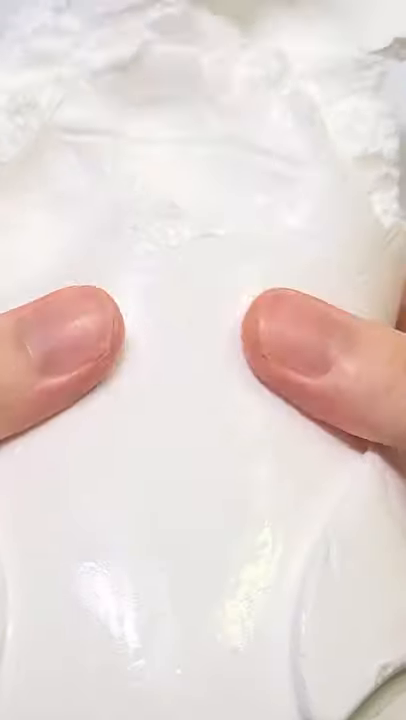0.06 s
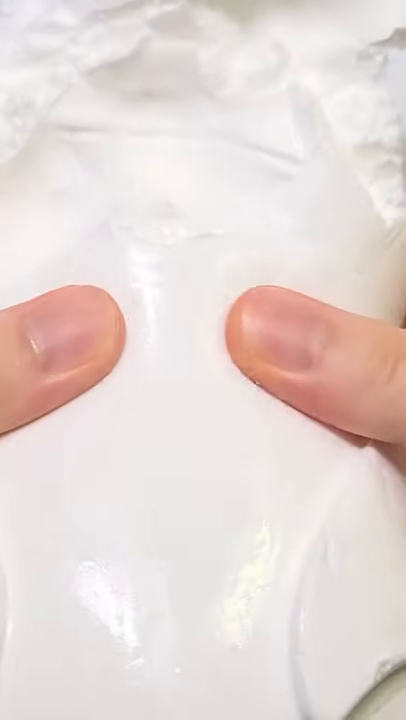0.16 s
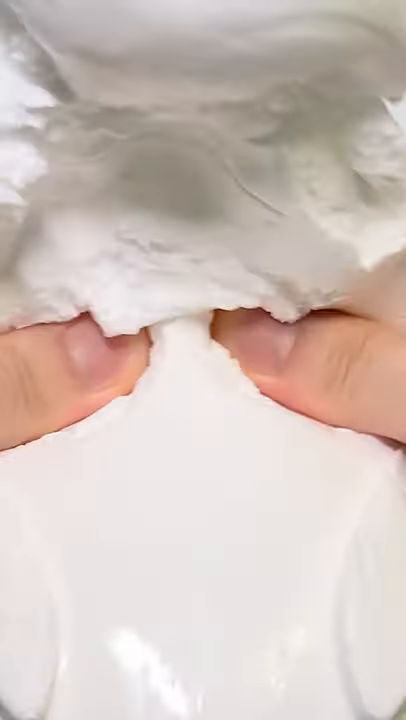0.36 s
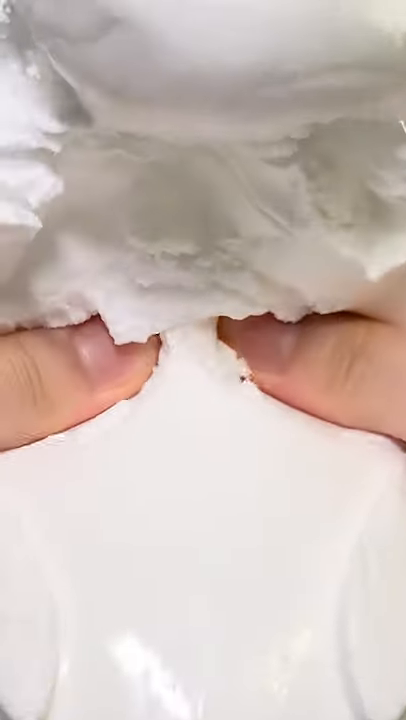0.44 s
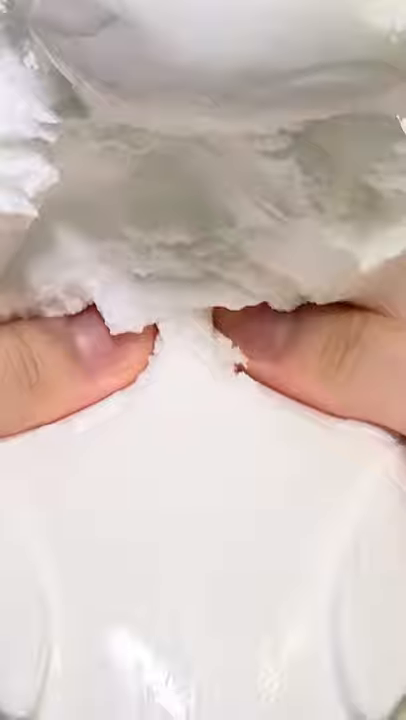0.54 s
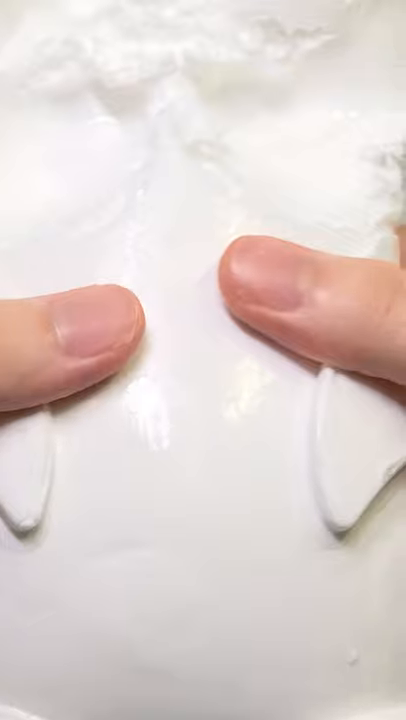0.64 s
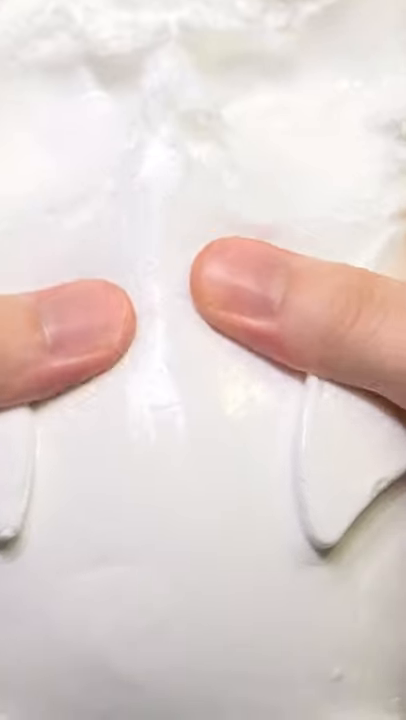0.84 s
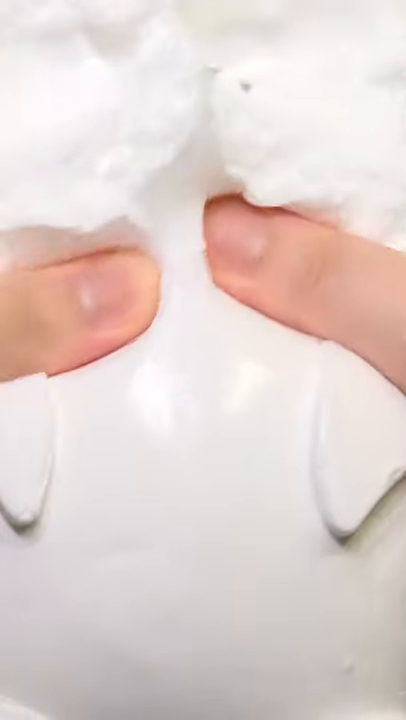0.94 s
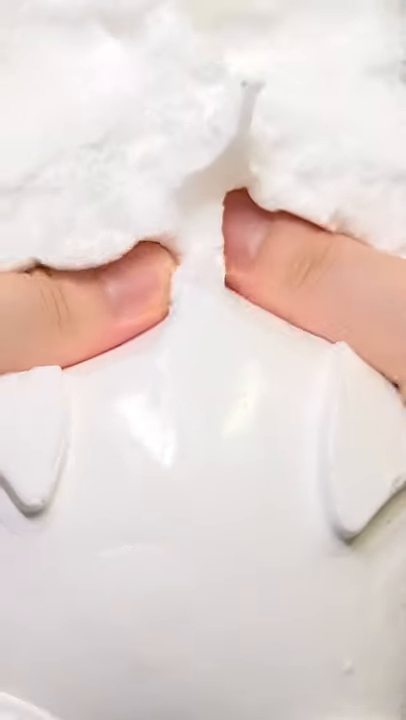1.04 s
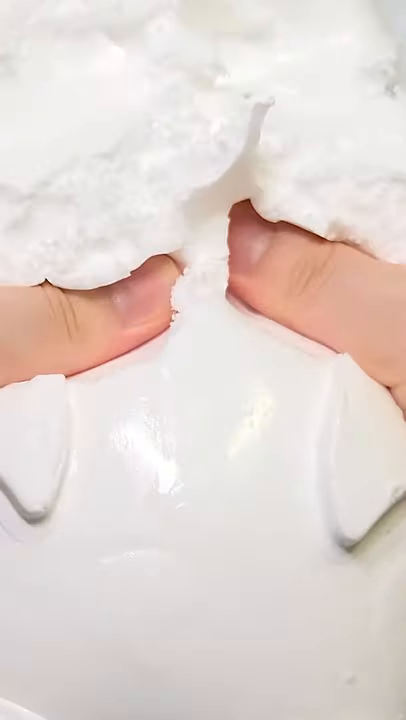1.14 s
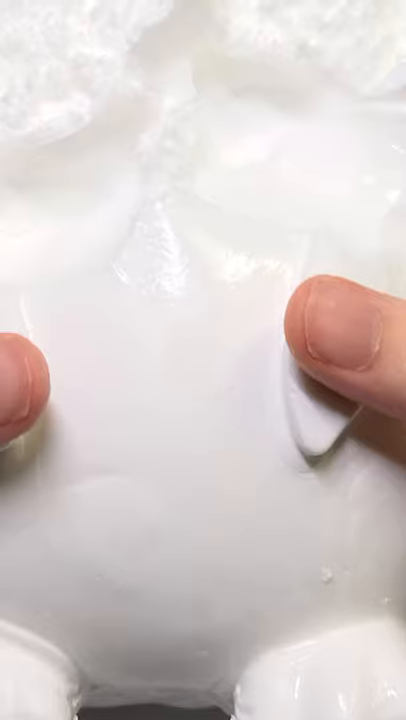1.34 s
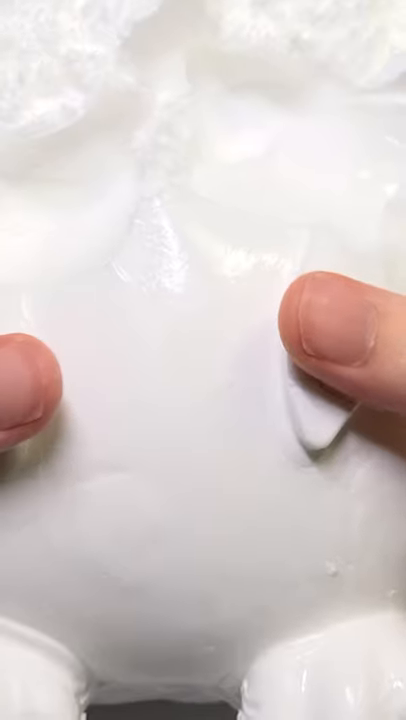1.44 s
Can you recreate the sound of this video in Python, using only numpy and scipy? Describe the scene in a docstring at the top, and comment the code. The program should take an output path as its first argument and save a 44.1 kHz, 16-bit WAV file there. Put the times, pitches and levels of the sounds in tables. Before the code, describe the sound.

A brittle crust of dry clay crunches under two thumbs, very close to the microphone in a small room. It breaks with sharp snaps and soft thuds, pauses briefly, then crunches again and ends in stray cracks.

```python
"""A brittle crust of dry clay breaks under two thumbs, pressed twice, very close to the microphone.
Each press starts with small ticks, breaks in loud snaps over a crumble of tiny fractures and ends in
stray cracks. A snap is a first break, a run of splinters and the ring of the freed flake. Skin hisses
faintly on the clay, the hollow under the crust resonates and the slab thuds as pieces give way.
A small room answers over a low rumble. The loudest snaps clip, with their peaks softly flattened."""
import sys
import numpy as np
from scipy import signal
from scipy.fft import rfft, irfft, next_fast_len
from scipy.io import wavfile

SR = 44100
rng = np.random.default_rng(int(sys.argv[2]) if len(sys.argv) > 2 else 0)


def output_pcm(signal):
    """Save a mono or channel-first signal as 16-bit PCM at the path in sys.argv[1].

    Samples are clipped to [-1, 1] before scaling.
    """
    pcm = np.clip(np.atleast_2d(signal).T, -1, 1) * 32767
    wavfile.write(sys.argv[1], SR, np.round(pcm).astype(np.int16))


N = 66150  # 1.5 s


def amp(db):
    """Decibels to gain."""
    return 10 ** (np.asarray(db) / 20)


def unit(x):
    """Scale to rms 1."""
    return x / np.sqrt(np.mean(x ** 2) + 1e-20)


def along(points, hz):
    """Read a curve of (f/Hz, value) points on a log frequency axis."""
    f, values = np.transpose(points)
    return np.interp(np.log(hz + 1), np.log(f + 1), values)


def fader(points, fade_s=0.02454):
    """Gain per sample from (t/s, level/dB) points, fading out beyond both ends."""
    times, db = np.transpose(points)
    t = np.arange(N) / SR
    outside_s = np.abs(t - np.clip(t, times[0], times[-1]))
    return amp(np.interp(t, times, db)) * np.exp(-outside_s / fade_s)


def filtered(x, response):
    """Filter x by a complex response of frequency."""
    size = next_fast_len(len(x) + SR // 4)
    return irfft(rfft(x, size) * response(np.fft.rfftfreq(size, 1 / SR)), size)[:len(x)]


def noise(response):
    """Filtered noise at rms 1."""
    return unit(filtered(rng.standard_normal(N), response))


def click(eq, size=1024):
    """A minimum-phase click of energy 1 whose spectrum in dB follows eq(Hz)."""
    cepstrum = irfft(np.log(amp(eq(np.fft.rfftfreq(size, 1 / SR)))))
    cepstrum[1:size // 2] *= 2
    cepstrum[size // 2 + 1:] = 0
    pulse = irfft(np.exp(rfft(cepstrum)))
    return pulse / np.linalg.norm(pulse)


def add(track, start_s, sound):
    """Mix a sound in at its start time."""
    i = max(0, round(start_s * SR))
    track[i:i + len(sound)] += sound[:len(track) - i]


# Crumble envelope of each press: t/s, level/dB
FIRST_EFFORT = [(0, -65.5), (.11, -67), (.17, -46), (.226, -28.5), (.238, -10), (.268, -20), (.295, -11),
                (.325, -17), (.39, -27), (.47, -49), (.56, -68.5), (.63, -63), (.68, -77.5)]
SECOND_EFFORT = [(.8, -83.5), (.862, -47), (.885, -16.5), (.9, -21.5), (.918, -12), (.955, -15.5),
                 (1.01, -27.5), (1.045, -18.5), (1.085, -31.5), (1.16, -41), (1.24, -59), (1.36, -71.5)]
# Crumble EQ of each press: f/Hz, level/dB
FIRST_CRUMBLE_EQ = [(300, -24.5), (650, -9), (900, -12), (1300, -8), (1750, -8), (2500, -14), (4500, -6),
                    (8000, -15.5), (16000, -29.5)]
SECOND_CRUMBLE_EQ = [(300, -24), (500, -6), (800, -5), (1300, -11), (2800, -5.5), (5000, -9.5), (7200, -8),
                     (11000, -18.5), (16000, -27)]
# Low end of the flexing slab: f/Hz, level/dB
FLEX_EQ = [(20, -12), (60, -8), (130, -1.5), (220, -4), (330, -14), (600, -46), (2000, -87)]


def crumble(effort, eq, grains_per_s=1400, spread_db=7, dust_db=-6, flex_db=-10.5):
    """Tiny fractures crunch over fine dust and the flexing slab; light pressure only rustles."""
    hits = rng.random(N) < grains_per_s / SR
    signs = rng.choice([-1, 1], N)
    sizes = amp(spread_db * np.minimum(rng.standard_normal(N), 2))
    grains = unit(hits * signs * sizes)
    fracture = click(lambda f: along(eq, f) - 10 * np.log10(1 + (300 / (f + 1)) ** 4))  # 300 Hz low cut
    dust = amp(dust_db) * rng.standard_normal(N)
    crunch = unit(signal.fftconvolve(grains + dust, fracture)[:N])
    hiss = signal.fftconvolve(rng.standard_normal(N), fracture)[:N]
    rustle = unit(filtered(hiss, lambda f: 1 / (1 + (f / 13000) ** 2)))
    flex = noise(lambda f: amp(along(FLEX_EQ, f)))
    force = fader(effort)
    breaking = force / (force + amp(-47))  # below -47 dB the duller rustle takes over
    return force * (np.sqrt(breaking) * crunch + np.sqrt(1 - breaking) * rustle + amp(flex_db) * flex)


# Rumble EQ: f/Hz, level/dB
RUMBLE_EQ = [(20, -6.5), (45, 2.5), (72, 3.5), (105, 2.5), (165, -3.5), (245, 3.5), (300, -25), (500, -33),
             (1500, -40.5), (5000, -40), (8000, -46), (16000, -49)]
# Rumble envelope: t/s, level/dB
RUMBLE_FADER = [(0, -51.5), (.5, -44.5), (.6, -51.5), (.75, -55), (.84, -47.5), (1.33, -51.5), (1.4, -66),
                (1.5, -71)]


def rumble():
    """A quiet bed of low room noise that swells twice and fades."""
    return fader(RUMBLE_FADER) * noise(lambda f: amp(along(RUMBLE_EQ, f)))


# Thumb slides: peak t/s, length/s, level/dB, centre f/Hz, half-width/octaves
THUMB_RUBS = [(0.0067, 0.091, -54.5, 4500, 0.76), (0.073, 0.024, -38.5, 4450, 0.49),
              (0.54, 0.014, -56, 1273, 0.15), (0.614, 0.045, -56, 4430, 0.3),
              (.618, 0.041, -54, 1249, 0.11), (0.645, 0.039, -65, 555.6, 1),
              (0.85, 0.041, -47.5, 1650, 0.047), (1.45, 0.095, -58, 3476, 0.28),
              (1.428, 0.11, -63.5, 1934, 0.59)]


def thumb_rubs():
    """Skin slides on clay in faint swells of narrow-band hiss."""
    out, t = np.zeros(N), np.arange(N) / SR
    for peak_s, length_s, db, hz, octaves in THUMB_RUBS:
        hiss = noise(lambda f: 1 / (1 + (np.log2((f + 1) / hz) / octaves) ** 2))
        swell = np.exp(-(2 * (t - peak_s) / length_s) ** 2)
        out += amp(db) * hiss * swell
    return out


# Cracks in the crust, the tick at 0.0608 s answered by its echo off the table at 0.0624 s: t/s, level/dB, flake
# f/Hz, ring level/dB, treble shelf/dB, t60/s, low-cut f/Hz
SNAP_CUES = [(.0538, -36.5, 3864, 8.5, -8.5, .012, 2400), (.0608, -25, 5260, -8.5, -15, 0.0072, 4690),
             (0.0624, -19, 3946, -1.5, -14.5, .009, 4433), (.123, -44, 4500, -4, -13, 0.024, 3900),
             (0.146, -36, 6060, -5, 0, 0.021, 1660), (0.1748, -24.5, 6060, -5, 3, .015, 1487),
             (.188, -26.5, 2794, -4, -3, .017, 1006), (0.19, -22.5, 3926, -3, -5, 0.015, 1212),
             (.206, -17.5, 2383, -11.5, -1.5, 0.022, 732), (0.2134, -15, 4855, -1, 2, 0.019, 1384),
             (0.2301, 4, 1217, -9, 0.5, 0.018, 400), (0.2336, 0, 2990, -3.5, 0, .011, 600),
             (0.243, -14, 5100, -6, 3.5, .011, 1488), (0.2465, -15.5, 4225, -3, 2.5, 0.01, 1283),
             (0.255, -13.5, 4394, -4, -2, 0.0088, 1294), (0.2664, -14.5, 3730, -6.5, -2, .011, 1110),
             (0.2759, 1.5, 1236, -2, 2, 0.0083, 444.4), (.284, 0.5, 1255, -6, 10.5, 0.024, 399.3),
             (.2865, -3, 1680, -1.5, 0, 0.014, 443), (.2975, -8, 6240, -3, 6, 0.013, 1506),
             (.307, -8.5, 1293, -5, -3.5, 0.013, 448), (.313, -13, 1736, 3.5, -8, 0.015, 550),
             (0.3186, -14, 1307, -4, 4, .011, 454), (.3325, -3, 1212, -7.5, -1.5, 0.0083, 350),
             (0.3471, -20, 4520, -5.5, 4.5, .011, 1300), (0.3636, -13.5, 1342, -7.5, 7, 0.0058, 494),
             (.375, -17.5, 1310, -7, -5, .011, 400), (.382, -15.5, 7080, -3, 6.5, 0.017, 2093),
             (.389, -18, 5160, 5, 4.5, .011, 1594), (.413, -30, 1310, -2, 2, .011, 500),
             (.4305, -20.5, 1238, -5, 3, 0.023, 449.7), (.464, -33.5, 4240, -4, -2.5, .011, 1201),
             (.607, -47.5, 1290, 8.5, -7, .03, 450), (.869, -28.5, 1488, -4, -1.5, 0.0091, 500),
             (0.8797, 6, 1326, -10.5, -4, .012, 699), (0.8882, -5.5, 2930, -2, 2, 0.014, 984),
             (.898, -13.5, 1700, -5, -7, .011, 748), (0.905, -15, 3326, -7, -4.5, .011, 1048),
             (0.909, -1, 2015, -3, -2, 0.0089, 540), (.912, 3, 2740, -2, 3, 0.022, 600),
             (0.9231, -15.5, 2610, -3, 0, .011, 850), (0.933, -12.5, 1973, -4, -0.5, 0.012, 710),
             (0.945, -14.5, 2930, -3.5, 2.5, 0.0097, 890), (0.952, -11, 2874, -4.5, 4, .007, 903),
             (0.9575, -14, 3380, -3, 2, 0.01, 1050), (.9748, -3, 3500, 4, -8.5, 0.018, 1400),
             (.9768, -5, 1950, 0.5, -7, 0.013, 392), (.982, -10, 2740, -6.5, 3.5, .011, 845),
             (0.991, -4.5, 2583, -4.5, 5, 0.011, 505), (0.999, -18, 2790, -9.5, -2.5, .011, 850),
             (1.0193, -11, 2800, -5, 12, 0.0073, 1106), (1.0305, -10, 2280, -5.5, -4.5, 0.0055, 1190),
             (1.04, -9.5, 2240, -9.5, 0, 0.0041, 500), (1.0476, -1.5, 2790, -1.5, -5, 0.012, 442),
             (1.0642, -8.5, 4140, -0.5, 1.5, 0.016, 500), (1.111, -8, 2280, -7, -3, 0.017, 500),
             (1.15, -18, 1875, -10, -19, 0.012, 880), (1.183, -32, 2260, -3, -17, 0.015, 950),
             (1.202, -34.5, 4100, 3, -17, 0.012, 1410), (1.213, -32.5, 2380, -4, 2, 0.028, 950),
             (1.28, -47.5, 2700, -1.5, -2, 0.011, 2010)]
# Base EQ of every snap: f/Hz, level/dB
SNAP_EQ = [(60, -22), (300, -11.5), (550, -2), (900, -0.5), (1400, 0), (3000, 0), (5000, -3), (8000, -6.5),
           (12000, -17.5), (16000, -20.5)]


def snaps(trim_db=-1.5, first_break_db=8.5, splinter_db=-1, spread_db=6, shelf_hz=5450):
    """Each crack is a first break, a fading run of splinters and the short ring of the flake."""
    mean_gap_s, release_s = 0.00013, 0.0012  # between splinters; for the flake to come free of them
    ring_cycles = 21  # to fall by 60 dB
    out, t = np.zeros(N), np.arange(SR // 25) / SR

    def unit_attack(x):
        """Scale the first 4 ms to rms 1."""
        return x / np.sqrt(np.mean(x[:SR // 250] ** 2) + 1e-20)

    for start_s, db, hz, ring_db, treble_db, t60, cut_hz in SNAP_CUES:
        hits = rng.random(len(t)) < 1 / (mean_gap_s * SR)
        sizes = amp(splinter_db + spread_db * rng.standard_normal(len(t)) - 60 * t / t60)
        splinters = hits * rng.choice([-1, 1], len(t)) * sizes
        splinters[0] = amp(first_break_db)
        low_cut = lambda f: -10 * np.log10(1 + (cut_hz / (f + 20)) ** 6.77)
        shelf = lambda f: treble_db * f ** 2 / (f ** 2 + shelf_hz ** 2)
        fracture = click(lambda f: along(SNAP_EQ, f) + low_cut(f) + shelf(f))
        crack = unit_attack(signal.fftconvolve(splinters, fracture)[:len(t)])
        envelope = amp(-60 * t * hz / ring_cycles) * (1 - np.exp(-2 * t * hz))
        swing = np.sin(2 * np.pi * hz * t) * envelope
        flake = np.diff(swing, 2)  # a small flake radiates its acceleration
        ring = unit_attack(signal.fftconvolve(splinters * np.exp(-t / release_s), flake)[:len(t)])
        add(out, start_s, amp(db + trim_db) * unit_attack(crack + amp(ring_db) * ring))
    return out


# Low hits of the slab: t/s, level/dB, f/Hz, t60/s
SLAB_THUDS = [(0.23, -1, 177, 0.056), (0.243, -6, 115, 0.078), (0.278, -6, 100, 0.081),
              (.286, -18.5, 189.7, 0.3), (0.371, -9.5, 66, 0.15), (.385, -23, 54.2, 0.28),
              (.43, -26.5, 73.5, 0.28), (0.901, -22, 50, 0.18), (0.959, -21, 107.1, 0.29),
              (.99, -30, 100, 0.086)]


def slab_thuds(attack_s=0.0025):
    """The slab swings, low and damped, as pieces give way."""
    out, t = np.zeros(N), np.arange(SR // 3) / SR
    for start_s, db, hz, t60 in SLAB_THUDS:
        envelope = amp(db - 60 * t / t60) * (1 - np.exp(-t / attack_s))
        add(out, start_s, -envelope * np.sin(2 * np.pi * hz * t))
    return out


# Resonances under the crust in each press: f/Hz, bandwidth/Hz, level/dB
FIRST_HOLLOW = [(1007, 69, -11.5), (1206, 100, -4), (1340, 5.7, -11.5), (1810, 160, -10)]
SECOND_HOLLOW = [(495, 73, -8.5), (1210, 40, -3), (1790, 160, 0), (2265, 120, -0.5), (2846, 98, -9.5)]


def hollow(x, modes):
    """The gap under the crust adds its resonances to the breaking clay."""
    def resonance(f, hz, width, db):
        return amp(db) * 1j * f * width / (hz * hz - f * f + 1j * f * width)

    return filtered(x, lambda f: 1 + sum(resonance(f, *mode) for mode in modes))


# Reverb EQ: f/Hz, level/dB
ROOM_EQ = [(100, 0.5), (500, -5.5), (1300, -2), (2000, -4.5), (5000, -8.5), (14000, 4.5)]
# Reverb decay: f/Hz, t60/s
ROOM_DECAY = [(200, 0.27), (1200, 0.11), (5000, 0.62), (14000, 0.2)]


def room(x):
    """The small room returns a diffuse tail in which each frequency dies at its own speed."""
    hz, t, spectrum = signal.stft(rng.standard_normal(SR // 2), SR, nperseg=256)
    tail_db = along(ROOM_EQ, hz)[:, None] - 60 * t / along(ROOM_DECAY, hz)[:, None]
    tail = signal.istft(spectrum * amp(tail_db), SR, nperseg=256)[1]
    impulse = np.pad(tail, (SR // 200, 0)) / np.linalg.norm(tail)  # 5 ms pre-delay
    return signal.fftconvolve(x, impulse)[:N]


def scene(direct_db=-0.5, room_db=-20):
    """Two presses, each through its own hollow, feed the room; thuds, rubs and rumble stay dry."""
    cracks = snaps()
    first_half = np.arange(N) < N // 2
    first_press = cracks * first_half + crumble(FIRST_EFFORT, FIRST_CRUMBLE_EQ)
    second_press = cracks * ~first_half + crumble(SECOND_EFFORT, SECOND_CRUMBLE_EQ)
    clay = hollow(first_press, FIRST_HOLLOW) + hollow(second_press, SECOND_HOLLOW)
    mix = rumble() + amp(direct_db) * clay + amp(room_db) * room(clay) + slab_thuds() + thumb_rubs()
    return mix[None]


def record(dry):
    """The loudest snaps clip, with their peaks softly flattened; a steep high cut trims the top."""
    ceiling, hardness, top_hz = 0.88, 4, 16100
    clipped = dry[0] / (1 + np.abs(dry[0] / ceiling) ** hardness) ** (1 / hardness)
    return filtered(clipped, lambda f: 1 / (1 + (f / top_hz) ** 120))[None]


dry = scene()
out = record(dry)
output_pcm(out)
```